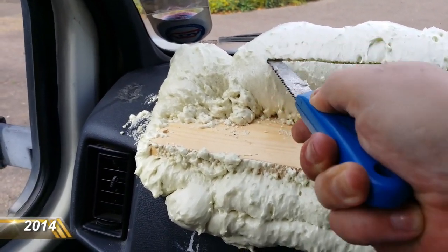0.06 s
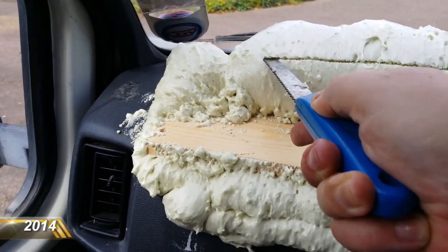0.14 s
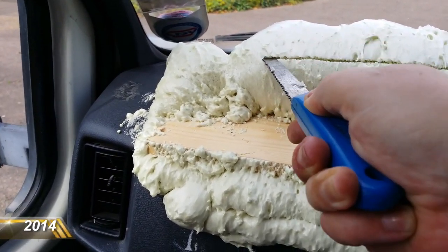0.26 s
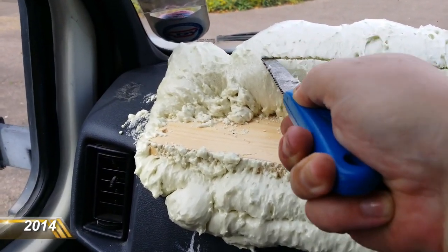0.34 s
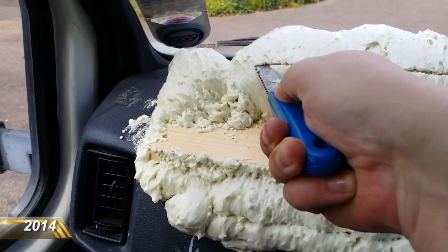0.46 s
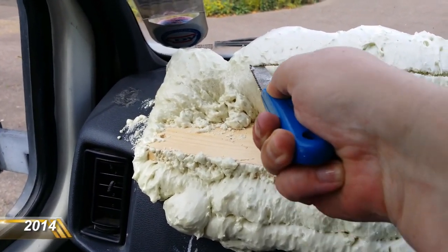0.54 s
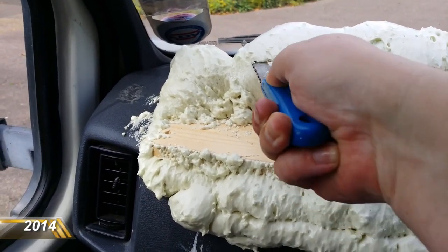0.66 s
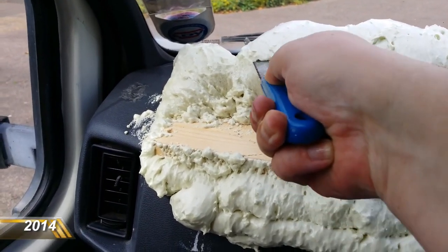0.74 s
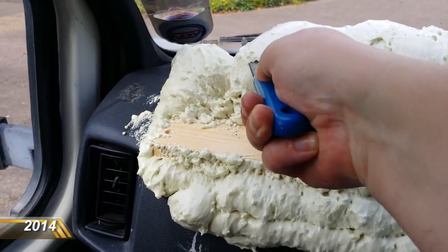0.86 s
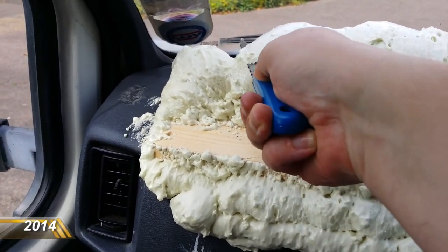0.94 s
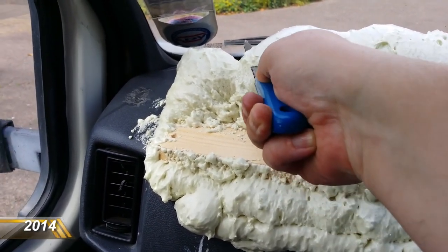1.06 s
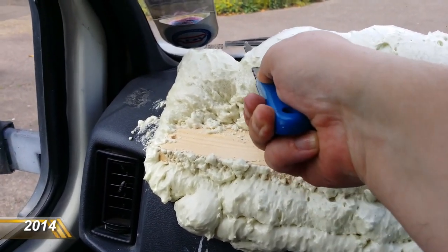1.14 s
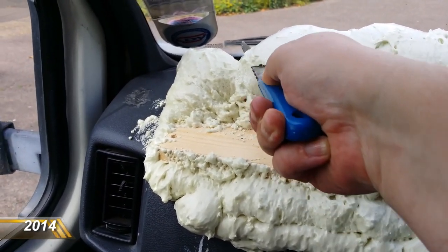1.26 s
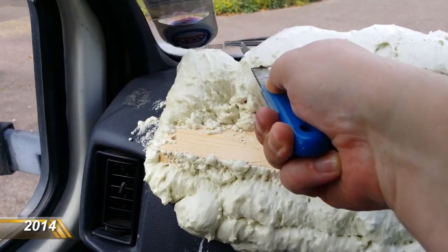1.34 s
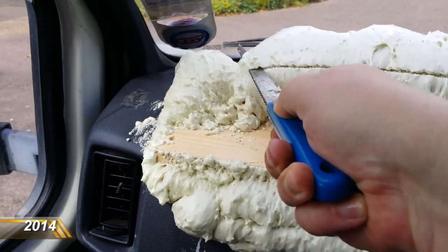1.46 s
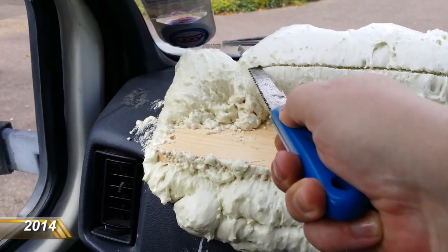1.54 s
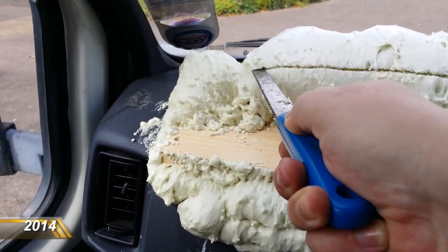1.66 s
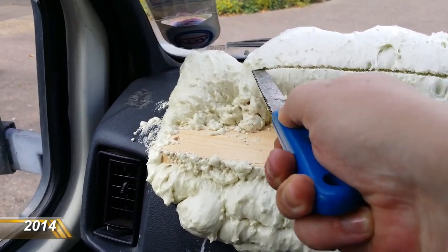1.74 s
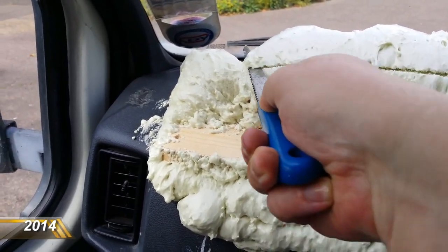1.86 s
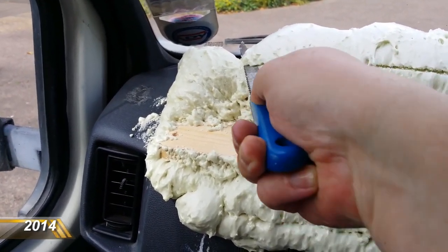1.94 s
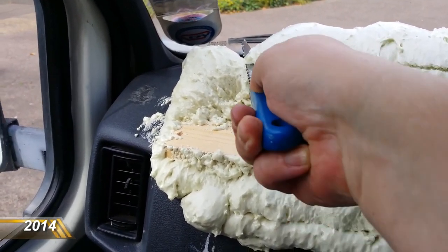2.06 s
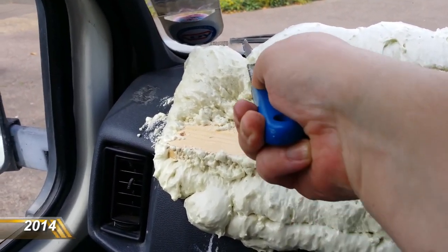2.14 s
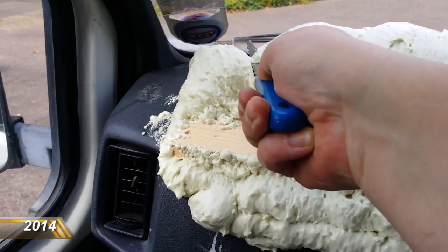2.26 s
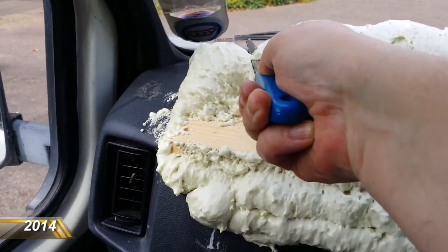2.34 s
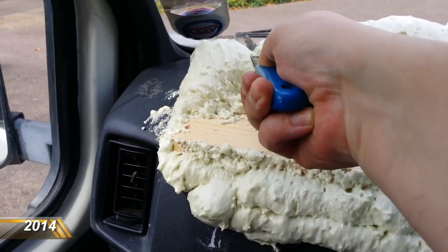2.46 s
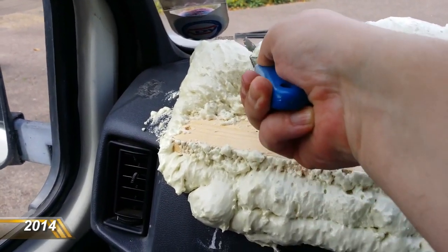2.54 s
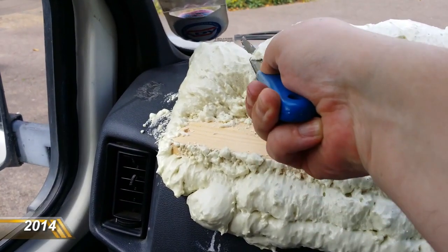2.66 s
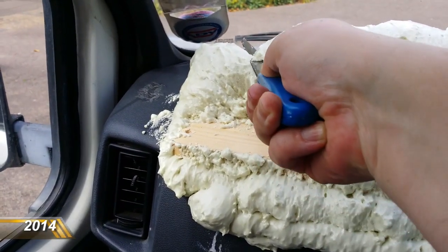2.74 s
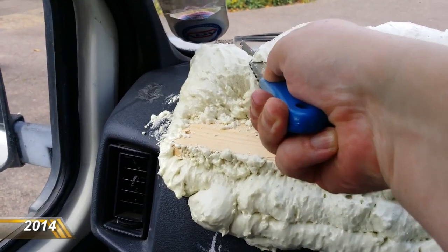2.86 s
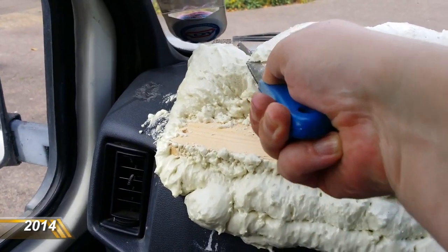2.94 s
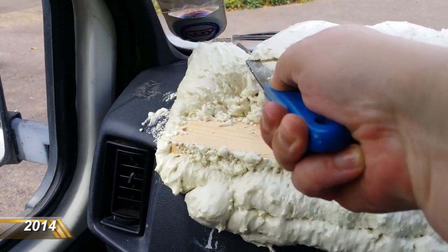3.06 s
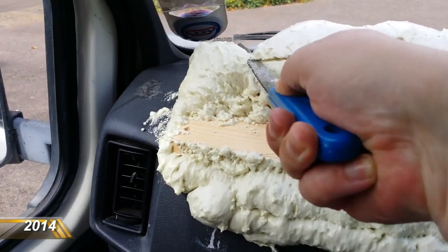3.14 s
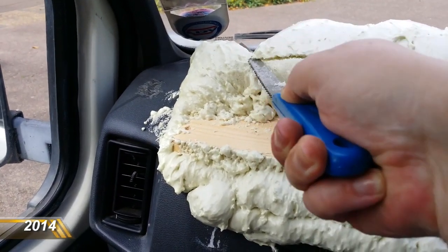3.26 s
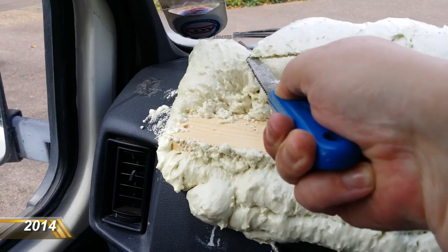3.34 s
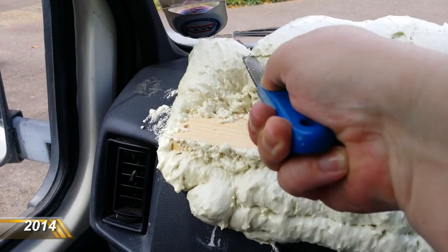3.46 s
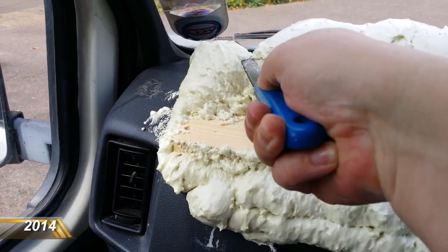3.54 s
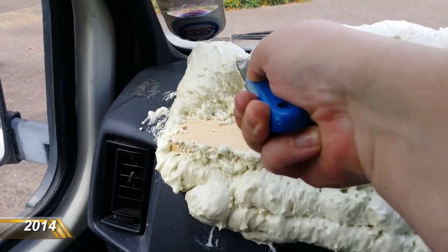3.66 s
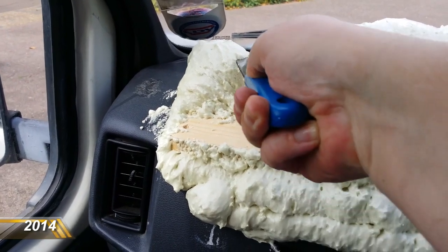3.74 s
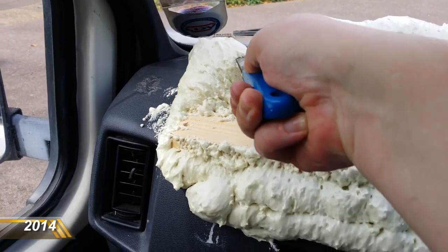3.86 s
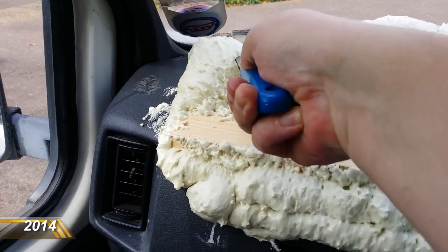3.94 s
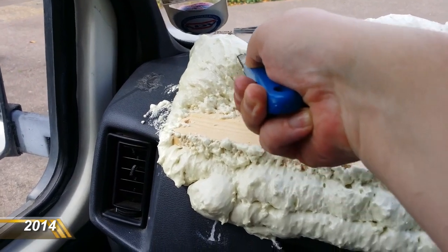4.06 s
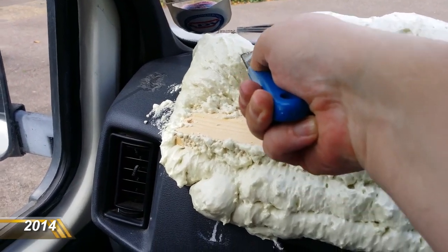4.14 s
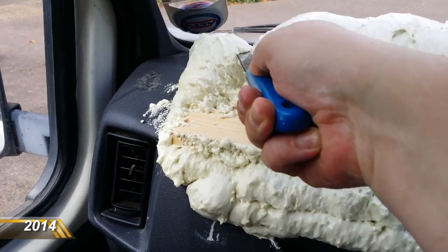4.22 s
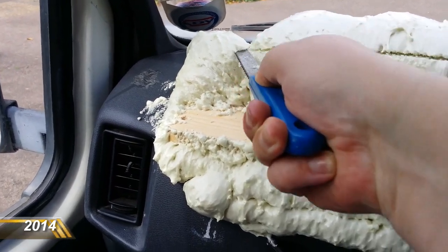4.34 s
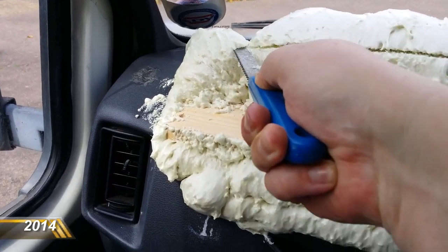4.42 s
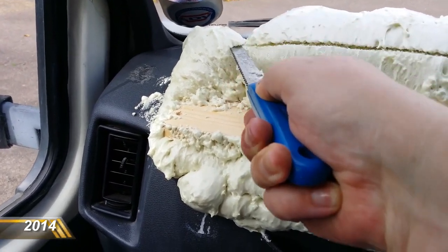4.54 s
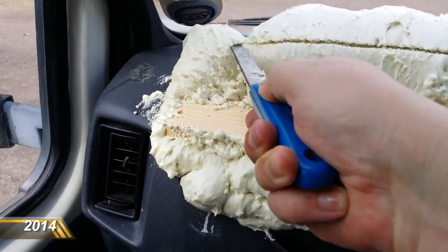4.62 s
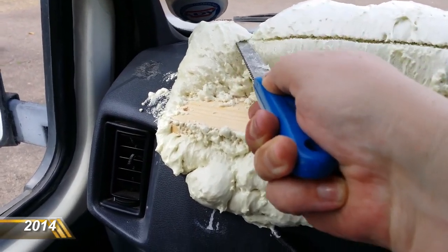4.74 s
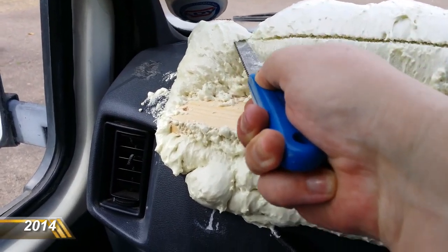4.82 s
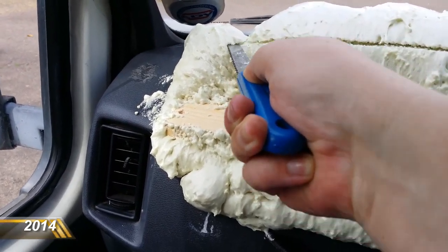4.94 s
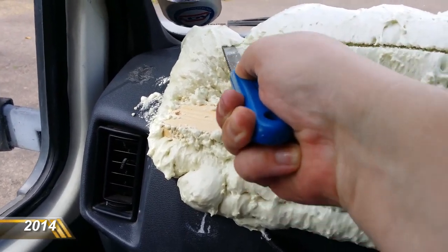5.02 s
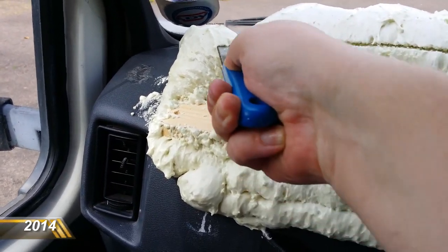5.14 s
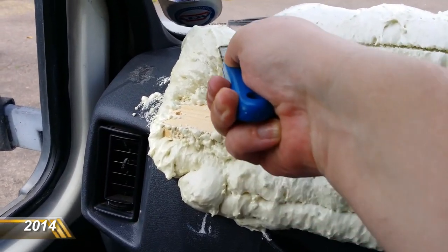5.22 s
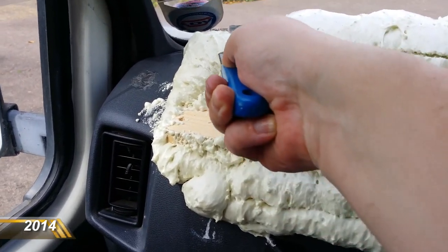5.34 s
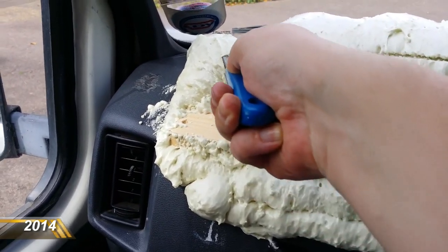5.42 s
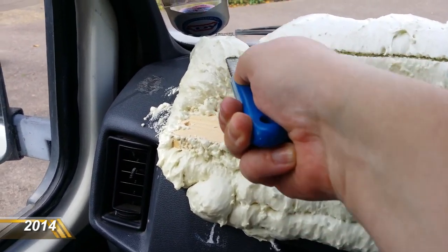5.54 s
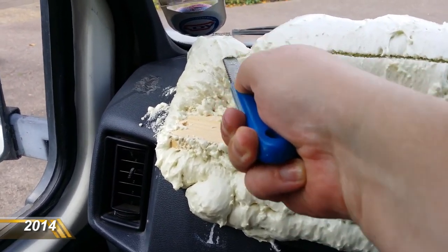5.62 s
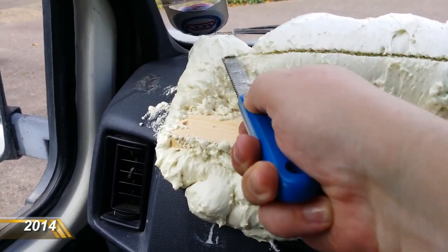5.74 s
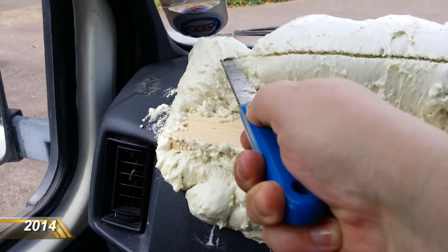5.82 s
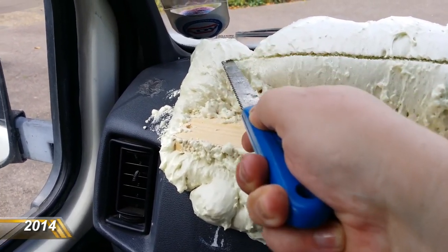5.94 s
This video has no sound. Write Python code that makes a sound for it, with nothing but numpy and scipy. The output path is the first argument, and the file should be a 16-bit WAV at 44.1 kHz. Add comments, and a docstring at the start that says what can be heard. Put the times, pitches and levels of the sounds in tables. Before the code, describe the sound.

Very close stereo sound of sawing stiff foam inside a car with outdoor air around. Nine uneven rasping strokes follow one another with almost no pause, bright and crunchy on top, with a hollow panel and block resonance below. Occasional clicks of breaking cells, short singing of the blade and two soft low air bumps occur early on. The final stroke slows at the end.

```python
"""A small hand saw, heard close, cuts hardened foam on a car's dashboard; the first of nine strokes is under way.
Push and pull follow in turn: bursts of noise for bursting cells and torn chips ring the blade, block and panel.
Hard cell walls snap as single clicks from 0.3 s to 5.5 s; now and then narrow bands of noise sing as chatter.
Air bumps the microphone softly near 0.9 s and 2.2 s; the last stroke is slowing down at the end.
Filtered noise and a wavering sine make the low outdoor air and hum throughout."""
import sys
import numpy as np
from scipy import signal
from scipy.fft import rfft, irfft
from scipy.io import wavfile
from scipy.ndimage import uniform_filter1d

SR = 44100
rng = np.random.default_rng(int(sys.argv[2]) if len(sys.argv) > 2 else 0)


def digitize_waveform(pressure):
    """Quantize a signal to 16-bit integers and store it at the path in sys.argv[1].

    Rows of a 2-D input are taken as channels; values are limited to [-1, 1].
    """
    field = np.atleast_2d(pressure).T
    bounded = np.clip(field, -1, 1)
    quanta = np.round(bounded * 32767).astype(np.int16)
    wavfile.write(sys.argv[1], SR, quanta)


N = 263718
TIME = np.arange(N) / SR
BINS = np.fft.rfftfreq(N, 1 / SR)  # Hz
EDGE_HZ = 14720  # top of the recorded band


def gain_of(db):
    """Decibels to amplitude."""
    return 10 ** (np.asarray(db) / 20)


def evened(x):
    """Scales to rms 1."""
    return x / np.sqrt(np.mean(x ** 2) + 1e-20)


def read(points, hz):
    """Joins (Hz, value) points on a log-frequency axis."""
    f, value = np.transpose(points)
    return np.interp(np.log(hz + 1), np.log(f + 1), value)


def shaped(x, gain):
    """Filters by a gain for each frequency."""
    return irfft(rfft(x) * gain, N)


def wobble(low_hz, high_hz):
    """Random motion of rms 1 between two rates."""
    rise = BINS / (BINS + low_hz)
    fall = 1 / np.sqrt(1 + (BINS / high_hz) ** 4)
    return evened(shaped(rng.standard_normal(N), rise * fall))


def hump(middle_s, length_s):
    """Half a cosine: rises to 1 at the middle, 0 outside."""
    return np.cos(np.pi * np.clip((TIME - middle_s) / length_s, -.5, .5))


def peak(hz, width_hz):
    """Resonance curve over frequency, 1 at its centre and half that at the edges of its width."""
    return 1 / (1 + (2 * (BINS - hz) / width_hz) ** 2)


def saw(uneven_db=0.44, rocking_db=.5, unseated_bite_db=-1):
    """Stroke and uneven foam set the loudness; the rocking hand's weight sets how much the body below sounds."""
    # How panel, hollow of the dash and block answer. Each row: share of the tearing in dB,
    # dB for each dB of weight, change before the blade is seated in dB.
    body = [(-13.5, 0.9, -10), (-15, 0.8, -9.5), (-11, 1.18, 0.5)]
    level_db, weight_db, bite_db, loose = strokes()
    level_db = level_db + uneven_db * wobble(7, 16)
    weight_db = weight_db + rocking_db * wobble(4.2, 4.3)
    shares_db = [db + follow * weight_db + unseated_db * loose for db, follow, unseated_db in body]
    shares_db += [bite_db + unseated_bite_db * loose, 0]
    sound = ports(ring(crackle(level_db)))

    # five adjoining bands: panel, hollow, block, bite, treble
    below = [1 / (1 + (BINS / hz) ** 10) for hz in (280, 700, 1350, 2800)]
    below.append(BINS < EDGE_HZ)
    bands = np.diff(below, axis=0, prepend=0)
    out = np.zeros((2, N))
    for band, share_db in zip(bands, shares_db):
        part = shaped(sound, band)
        # the arm pushes steadily: single catches do not change the loudness over a tenth of a second
        power = uniform_filter1d(part.mean(0) ** 2, size=SR // 10)
        steady = part / np.sqrt(power + 1e-20)
        out += steady * gain_of(level_db + share_db)
    return out


def strokes(speed_power=2.65, resting_db=-60, seating_s=0.11):
    """Blade speed rises and falls in each stroke, tearing grows as its power; the blade then seats in the cut."""
    # Push and pull in turn. Each row: start in s, end in s, speeding up in s, slowing down in s,
    # treble level at mid-stroke in dB, change of level along the stroke in dB, weight on the body in dB,
    # bite of the teeth in dB.
    stroke_rows = [(-.25, 0.274, 0.19, 0.093, -21, -12.5, 1, -7),
                   (0.242, 1.211, .175, .275, -25.5, -14, 1, -7.5),
                   (1.197, 1.736, 0.24, .1, -23.5, -8.5, 2.5, -4.8),
                   (1.703, 2.638, .14, .2, -26.6, -2.5, 3.5, -4.5),
                   (2.623, 3.354, .16, .115, -27.5, -3, 3.5, -3.7),
                   (3.332, 4.095, .185, .132, -22.5, -7, -1.1, -6),
                   (4.062, 4.753, .235, .096, -24.5, -2.5, 0.4, -3.5),
                   (4.746, 5.47, 0.22, 0.11, -21.5, -4, -4.5, -6),
                   (5.446, 6.017, 0.19, 0.14, -19.5, -0.5, -3.4, -6.5)]
    # The blade binds in the cut and slows down. Each row: middle in s, length in s, dip in dB.
    binds = [(.771, 0.52, -4.5), (2.29, 0.29, -6), (3.696, .236, -4.5), (4.145, 0.098, -5),
             (5.14, .22, -1.5)]
    tearing, loose = np.zeros(N), np.zeros(N)
    for start, end, rise_s, fall_s, db, change_db, _, _ in stroke_rows:
        age = np.clip(TIME - start, 0, end - start)
        speeding_up = np.sin(np.pi / 2 * np.minimum(age / rise_s, 1))
        slowing_down = np.sin(np.pi / 2 * np.clip((end - TIME) / fall_s, 0, 1))
        speed = speeding_up * slowing_down
        tearing += speed ** speed_power * gain_of(db + change_db * (age / (end - start) - .5))
        loose = np.where(TIME > start, np.exp(-age / seating_s), loose)  # 1 unseated, 0 seated

    # the teeth still creak at resting_db while the blade turns round
    level_db = 20 * np.log10(np.hypot(tearing, gain_of(resting_db)))
    for middle_s, length_s, dip_db in binds:
        level_db += dip_db * hump(middle_s, length_s) ** 2
    starts, *_, weight_db, bite_db = np.transpose(stroke_rows)
    current = np.searchsorted(starts, TIME) - 1
    return level_db, *uniform_filter1d([weight_db[current], bite_db[current], loose], size=SR // 30)


def crackle(level_db, cells_per_s=3800, size_db=2.0, catch_db=-0.63, tooth_db=0.74,
            rub_db=-7, chip_db=-10.5, spots_per_s=10, spread_spots=1.8, count=36):
    """Cells burst in clumps as the teeth catch and slip, more of them at speed; the blade's flanks rub."""
    grip = gain_of(catch_db * wobble(30, 130) + tooth_db * wobble(120, 1300))
    speed = gain_of((level_db - level_db.max()) / 4)  # 1 at the loudest; the rates apply there
    bursts = rng.random(N) < cells_per_s * speed / SR
    signs = rng.choice([-1, 1], N)
    sizes = gain_of(size_db * np.minimum(rng.exponential(1, N), 4))
    cells = bursts * signs * sizes / np.sqrt(speed)
    # the biting spot travels with the blade, so the fine colour keeps shifting
    travel = np.cumsum(spots_per_s * speed) / SR
    spot = np.floor(travel + spread_spots * rng.standard_normal(N)) % count
    grains = sum(scatter(cells * grip * (spot == k)) for k in range(count))
    rub = evened(grip * rng.standard_normal((2, N)))
    return evened(grains) + gain_of(rub_db) * rub + gain_of(chip_db) * crunch(speed)


def crunch(speed, chips_per_s=85, chip_s=0.0024, dull_hz=3000, size_db=3.5, uneven=.6):
    """Tooth after tooth rips out a chip at an uneven pace: a duller clump of cells, milliseconds long."""
    pace = chips_per_s * speed * np.exp(uneven * wobble(20, 200))
    passed = np.floor(np.cumsum(pace) / SR)
    sizes = gain_of(size_db * np.clip(rng.standard_normal(N), -2, 1.3))
    rips = (np.diff(passed, prepend=0) > 0) * sizes
    age = np.arange(SR // 16) / SR / chip_s  # the clump peaks at age 1
    clumps = signal.oaconvolve(rips, age * np.exp(-age))[:N]
    dulling = 1 / np.sqrt(1 + (BINS / dull_hz) ** 4)
    return evened(shaped(clumps * rng.standard_normal((2, N)), dulling))


def scatter(clicks, bounces_t60=.007, cabin_t60=0.059, cabin_db=-6):
    """One spot of the cut reaches each port by its own quick bounces, then by the cabin's short tail."""
    t = np.arange(SR // 8) / SR
    near, cabin = rng.standard_normal((2, 2, len(t)))
    bounces = evened(near * gain_of(-60 * t / bounces_t60))
    tail = evened(cabin * gain_of(-60 * t / cabin_t60))
    path = bounces + gain_of(cabin_db) * tail
    path /= np.linalg.norm(path, axis=1, keepdims=True)
    return signal.oaconvolve(clicks[None], path, axes=1)[:, :N]


def ring(x):
    """Causal response of blade, block and panel: each click leaves their modes ringing."""
    # Broad colour of the cutting. Each row: frequency in Hz, relative level in dB per Hz.
    rasp = [(41, -29), (70, -4), (188, 2), (505, -10.5), (578, -7), (791, -4), (906, 1.5), (1270, 1),
            (1480, 3.5), (2220, 6.5), (2850, 5.5), (4560, 0), (6680, 2), (13700, -0.5), (15000, -5.5)]
    # Resonances of panel, block and blade. Each row: frequency in Hz, width in Hz, lift over the colour in dB.
    modes = [(102.4, 54, 12), (193.7, 64, 10.5), (277, 14, 8), (425, 40, 7.5), (576, 117, 7),
             (730, 44, 11.5), (897, 106, 10.5), (1147, 120, 9.5), (1432, 133, 6.5), (1780, 100, 5),
             (2256, 29, 8.5), (2596, 68, 2), (4630, 1430, 7.5), (5320, 86, 4.5), (8710, 1160, 4)]
    db = read(rasp, BINS) + sum(lift_db * peak(hz, width_hz) for hz, width_hz, lift_db in modes)
    log_gain = np.log(gain_of(np.maximum(db, -100)))
    circle = np.concatenate([log_gain, log_gain[-2:0:-1]])
    minimum_phase = np.exp(np.conj(signal.hilbert(circle)))
    return shaped(x, minimum_phase[:len(BINS)])


def ports(pair):
    """Two unrelated signals become left and right: alike in the bass, shaded by the hand in the treble."""
    # Each row: frequency in Hz, left over right in dB.
    balance_db = [(100, -2), (220, -1.7), (380, -5), (700, -1.5), (1000, -3.5), (1500, 7.5), (2400, 5),
                  (4600, 3.5), (6500, 1), (8600, -5.5), (11000, -1.5), (14000, 4)]
    # Each row: frequency in Hz, likeness of the ports from 0 to 1.
    likeness = [(60, 0.98), (200, 0.93), (400, 0.53), (600, 0.93), (900, 0.85), (1400, 0.97), (2200, 0.068),
                (5000, 0.18), (8000, 0.021)]
    # Each row: frequency in Hz, lead of the left in radians.
    lead_rad = [(100, 0.11), (700, 0.47), (1200, 1.5), (1550, 0.96), (1800, 1.62), (2800, 0.23),
                (5000, 0.011)]
    a, b = rfft(pair)
    same = np.clip(read(likeness, BINS), 0, 1)
    tilt = gain_of(read(balance_db, BINS) / 2)
    right = (same * a + np.sqrt(1 - same ** 2) * b) * np.exp(-1j * read(lead_rad, BINS))
    return irfft(np.array([a * tilt, right / tilt]), N)


def snaps(ringing_db=12):
    """Single hard cell walls break and ring the same body, which spreads each click over many samples."""
    # A tooth tears through a hard cell wall. Each row: time in s, relative click level in dB.
    snap_rows = [(.296, -21), (.317, -13), (1.103, -18), (1.918, -8), (2.025, -11), (2.688, -19),
                 (2.7865, -6.5), (2.841, -12), (2.991, -11.5), (3.204, -12), (3.281, -11.5), (3.389, -20),
                 (3.443, -12), (4.498, -10), (4.532, -6.5), (4.668, -12.5), (4.787, -25.5), (4.817, -17.5),
                 (5.003, -8), (5.084, -5), (5.524, -13)]
    clicks = [gain_of(db) * (np.arange(N) == round(s * SR)) for s, db in snap_rows]
    rung = ports(ring(sum(scatter(click) for click in clicks)))
    return evened(rung) * np.std(sum(clicks)) * gain_of(ringing_db)


def swells(rows):
    """Each row is a resonance shaken at random, swelling and fading."""
    out = np.zeros((2, N))
    for middle_s, length_s, hz, width_hz, db in rows:
        window = hump(middle_s, length_s)
        tone = shaped(rng.standard_normal((2, N)), peak(hz, width_hz)) * window
        rms = np.sqrt((tone ** 2).sum(1, keepdims=True) / (window ** 2).sum())
        out += gain_of(db) * tone / rms
    return ports(out)


def chatter():
    """Blade or panel sings briefly when the teeth chatter in the cut."""
    # Each row: middle in s, length in s, frequency in Hz, width in Hz, level before the ports in dB.
    chatter_rows = [(.03, 0.066, 553, 71, -29), (.14, 0.23, 585, 60, -31.5), (.05, 0.12, 906, 70, -28.5),
                    (.47, 0.23, 920, 70, -28.5), (1.44, .22, 960, 171, -30), (1.53, 0.28, 1880, 200, -29),
                    (1.56, 0.22, 355, 50, -39), (2.03, 0.27, 188, 62, -35.5), (3.53, .2, 188, 62, -34),
                    (4.99, .3, 1533, 120.1, -38), (5.73, .16, 2270, 119.9, -23),
                    (5.85, 0.27, 1541, 79.96, -31.5)]
    return swells(chatter_rows)


def air_bumps():
    """Air bumps the microphone: short swells of low, narrow noise."""
    # Each row: middle in s, length in s, frequency in Hz, width in Hz, level before the ports in dB.
    bump_rows = [(.89, 0.15, 57, 22, -33.5), (2.2, 0.19, 48.3, 54, -29.5), (2.33, 0.51, 58, 30.97, -43)]
    return swells(bump_rows)


def background(air_db=-52.5, hum_db=-57, hum_hz=52.5, waver_hz=0.78, waver_db=6.0):
    """Faint outdoor air as filtered noise, with a low sine hum wavering in pitch and level."""
    # Colour of the air. Each row: frequency in Hz, relative level in dB per Hz.
    air_colour = [(20, -5), (45, -1), (128, -3), (300, -12.5), (600, -11), (2000, -31), (4000, -36),
                  (14000, -42)]
    noise = shaped(rng.standard_normal((2, N)), gain_of(read(air_colour, BINS)))
    air = evened(ports(noise))
    pitch_hz = hum_hz + waver_hz * wobble(0.74, 5.1)
    hum = np.sin(2 * np.pi * np.cumsum(pitch_hz) / SR) * gain_of(waver_db * wobble(1, 3.5))
    return gain_of(air_db) * air + gain_of(hum_db) * evened(hum)


def scene():
    """All sources at the two ports."""
    return saw() + snaps() + chatter() + air_bumps() + background()


def record(dry):
    """The recorder rounds off the tallest peaks and limits the band."""
    ceiling = .85
    rounded = dry / (1 + (dry / ceiling) ** 6) ** (1 / 6)
    lowpass = signal.firwin(601, EDGE_HZ, window=("kaiser", 8), fs=SR)
    return signal.oaconvolve(rounded, lowpass[None], "same")


dry = scene()
out = record(dry)
digitize_waveform(out)
```